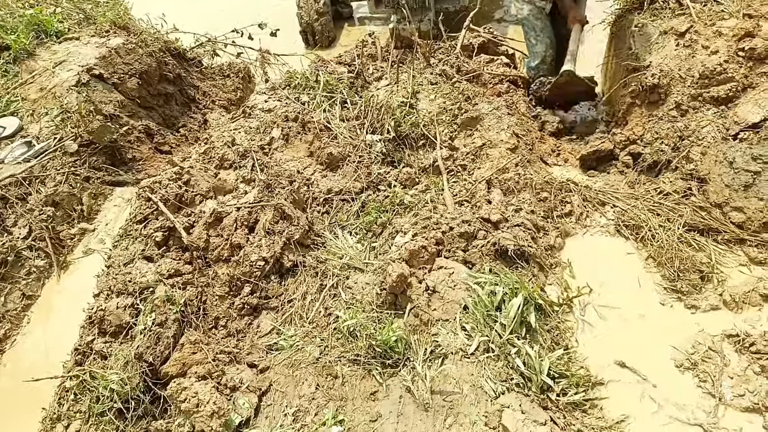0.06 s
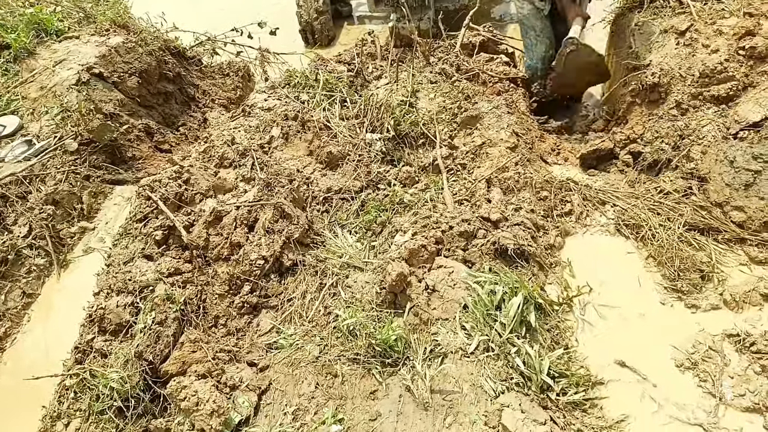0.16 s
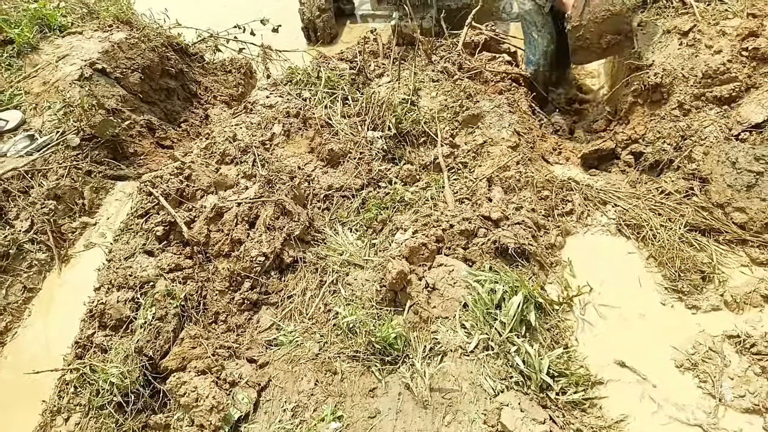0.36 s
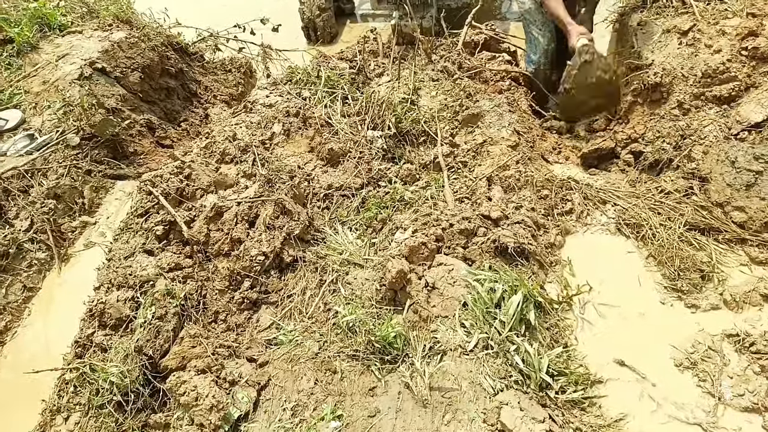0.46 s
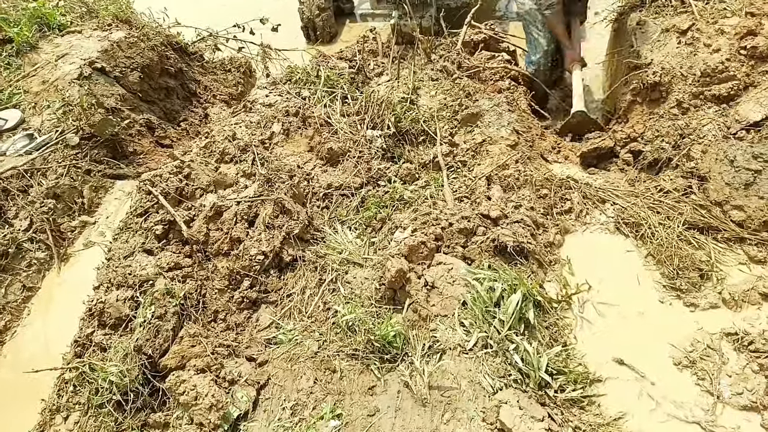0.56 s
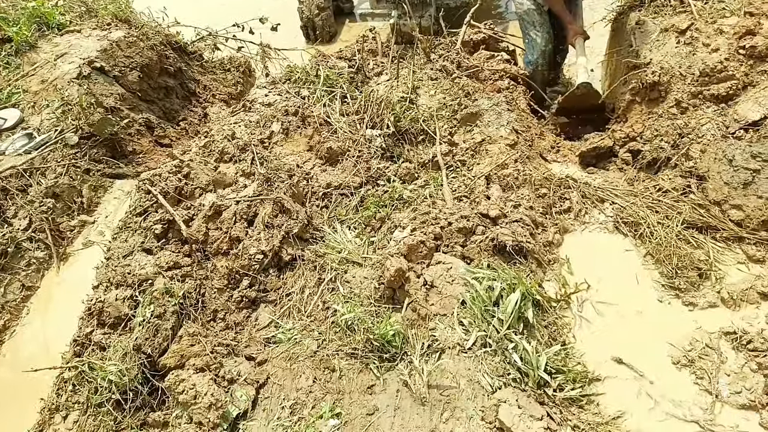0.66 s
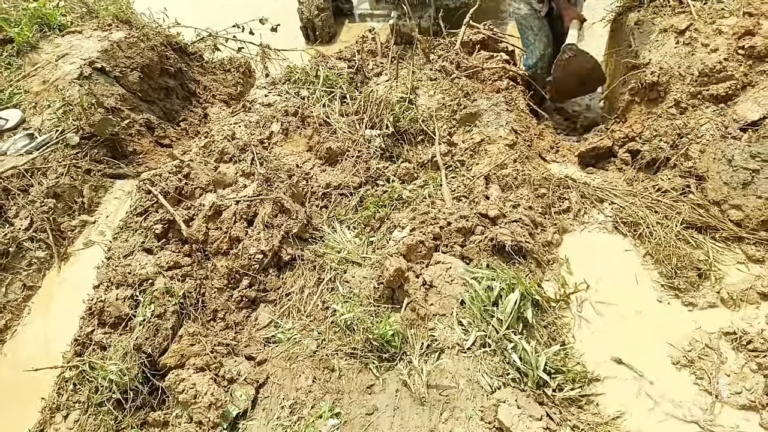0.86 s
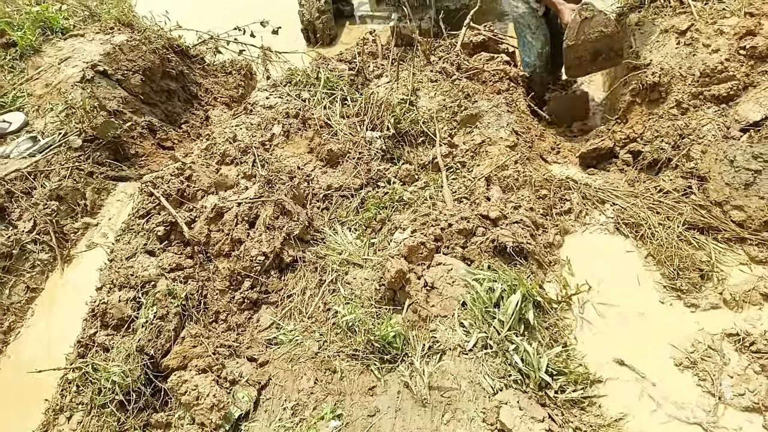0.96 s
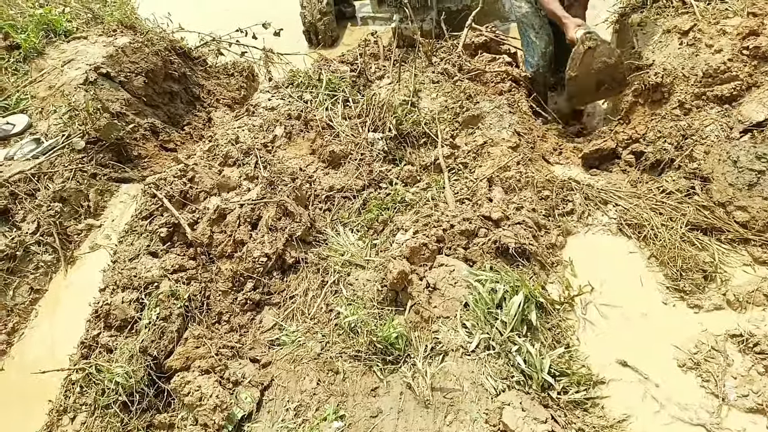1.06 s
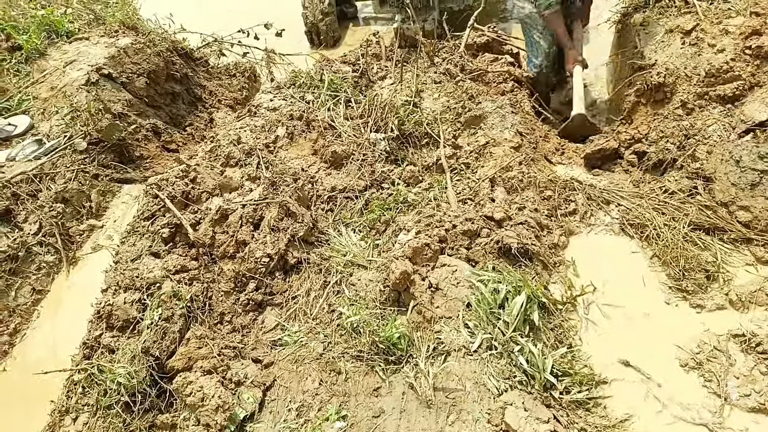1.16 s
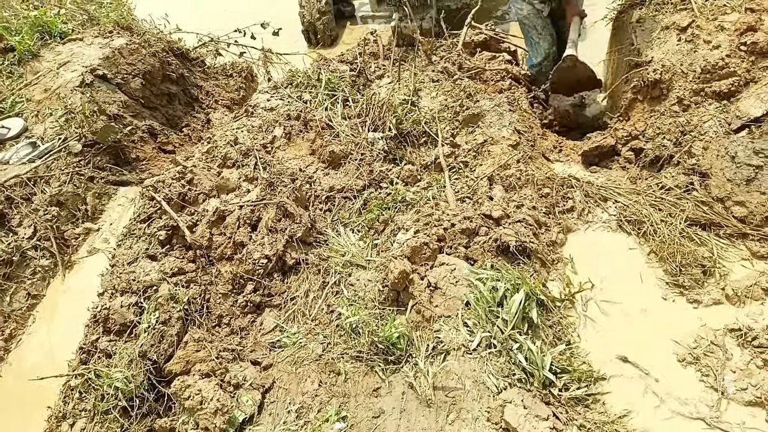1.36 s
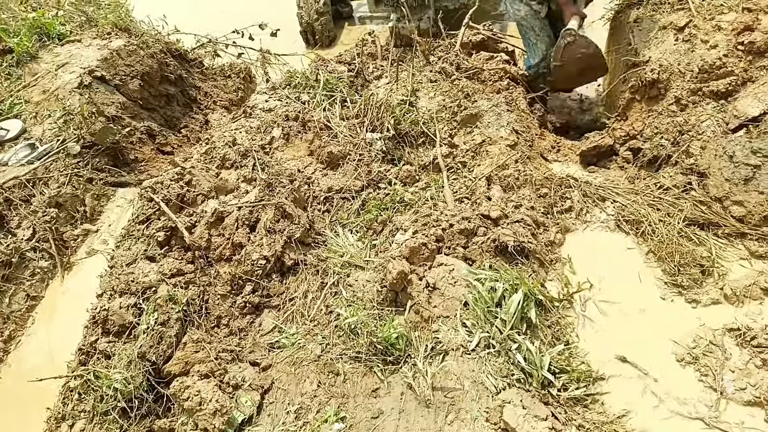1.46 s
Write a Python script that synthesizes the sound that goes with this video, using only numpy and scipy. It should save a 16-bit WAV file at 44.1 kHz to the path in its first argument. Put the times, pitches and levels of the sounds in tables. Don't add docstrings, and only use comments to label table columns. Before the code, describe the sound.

A spade works waterlogged mud, close and dry outdoors. Faint wet ticks and bubbles open until 0.2 s. From 0.23 to 0.5 s come the loudest slaps, low hollow plops, thick squelches and hissing spray. Soft bubbles fill a lull around 0.55 to 0.75 s. Lighter splashes return from 0.8 s, with a gulping squelch near 1.15 s, fading to tiny bright drops after 1.4 s.

```python
import sys
import numpy as np
from scipy import signal
from scipy.fft import rfft, irfft, next_fast_len
from scipy.io import wavfile
from scipy.ndimage import map_coordinates

SR = 44100
rng = np.random.default_rng(int(sys.argv[2]) if len(sys.argv) > 2 else 0)


def volts_from_decibels(level):
    exponent = np.asarray(level, float) / 20
    return 10 ** exponent


def persist_wave(psi):
    counts = np.round(np.clip(psi, -1, 1) * 32767).astype(np.int16)
    wavfile.write(sys.argv[1], SR, np.atleast_2d(counts).T)


N = 66150
RISE = 0.2


def unit(x):
    return x / np.sqrt(np.mean(x ** 2) + 1e-20)


def along(points, hz):
    f, v = np.transpose(points)
    return np.interp(np.log(hz + 1), np.log(f + 1), v)


def curve(rows):
    s, db = np.transpose(rows)
    return np.interp(np.arange(N) / SR, s, db)


def wobble(rate):
    return map_coordinates(rng.standard_normal(N // 40), [np.arange(N) * rate / SR])


def filtered(x, response):
    m = next_fast_len(N + 8192)
    hz = np.fft.rfftfreq(m, 1 / SR)
    return irfft(rfft(x, m) * response(hz), m)[..., :N]


def coloured(x, spectrum):
    return unit(filtered(x, lambda hz: volts_from_decibels(along(spectrum, hz))))


def thinned(x, level_db, edge_hz, full_db, extra):
    low = filtered(x, lambda hz: 1 / (1 + (hz / edge_hz) ** 8))
    loss_db = extra * np.minimum(level_db - full_db, 0)
    return x - low * (1 - volts_from_decibels(loss_db))


def tones(s, gain, hz, life, glide, swell, size):
    t = np.arange(size) / SR
    u = t / life[:, None]
    shape = (1 - np.exp(-u / swell)) ** 2 * 10 ** -u * (1 + 6 * swell)
    bend = 1 + glide * np.minimum(u, 2) / 2
    wave = gain[:, None] * shape * np.sin(2 * np.pi * hz[:, None] * t * bend)
    at = np.round(s * SR).astype(int)[:, None] + np.arange(size)
    return np.bincount(at.ravel(), wave.ravel(), N + size + SR)[:N]


def grains(count, centre_hz, spread, cycles, scatter_db, size):
    def stream():
        s = rng.uniform(0, N / SR, count)
        a, b = rng.standard_normal((2, count))
        rarity = np.minimum(rng.exponential(1, count), 3)
        hz = np.clip(centre_hz * np.exp(spread * a), 60, 17000)
        gain = volts_from_decibels(scatter_db * rarity) * np.sign(b)
        return tones(s, gain, hz, cycles * np.exp(0.5 * b) / hz, RISE, .1, size)
    return unit(np.array([stream(), stream()]))


def bell(hz, centre_hz, width):
    return np.exp(-(np.log((hz + 1) / centre_hz) / width) ** 2 / 2)


def bursts(rows, source, response):
    size, attack_s, crack, level_db = 8192, 0.00027, 3, -6.5
    t, hz = np.arange(size) / SR, np.fft.rfftfreq(size, 1 / SR)
    out = np.zeros((2, N + size))
    contact = crack * np.exp(-2j * np.pi * hz * 2 * attack_s)
    starts = rng.integers(0, N - size, size=len(rows))
    for (s, db, centre_hz, t60), start in zip(rows, starts):
        shape = volts_from_decibels(-60 * t / max(t60, .005)) * (1 - np.exp(-t / attack_s))
        spectrum = rfft(source[:, start:start + size]) + contact
        piece = shape * irfft(spectrum * response(hz, centre_hz), size)
        gain = volts_from_decibels(db + level_db) * np.sqrt(np.mean(shape ** 2))
        out[:, round(s * SR):][:, :size] += gain * unit(piece)
    return out[:, :N]


def both_ports(x):
    return np.array([x, np.roll(x, 57)])


# f/Hz, level/dB per Hz
AIR = [(30, -18.5), (100, 1), (480, -11.5), (800, -52.5), (2200, -33.5), (6500, -29), (12000, -20),
       (15500, -34)]
# t/s, level/dB
HUSH = [(0, 3), (.07, -4.5), (.12, 9), (.55, -2.5), (.64, -3), (.75, -0.5), (1.5, 4)]


def field_air():
    noise = rng.standard_normal((3, N))
    air = volts_from_decibels(-78 + 0.92 * wobble(12.1)) * coloured(noise, AIR)
    hiss = filtered(air, lambda hz: hz > 1000)
    air = air + (volts_from_decibels(curve(HUSH)) - 1) * hiss
    return air[0] + .8 * air[1:]


# t/s, peak level/dB, centre f/Hz, t60/s
SLAPS = [(0, -46, 3040, 0.13), (.086, -59.5, 3100, 0.11), (.135, -43.5, 5700, 0.019),
         (.174, -33.5, 3060, 0.03), (.22, -41.5, 4300, 0.1), (.267, -25, 1970, 0.054),
         (.285, -32, 3860, 0.13), (.422, -27.5, 2100, 0.02), (.433, -31, 2320, 0.045),
         (.4415, -19, 2120, 0.026), (.481, -25, 3730, 0.025), (.493, -27.5, 3100, 0.026),
         (.5, -23, 1660, 0.056), (.661, -47, 1770, 0.21), (.746, -37, 3080, 0.037), (.81, -30, 2450, 0.051),
         (.815, -34, 1630, 0.092), (.861, -36.5, 3400, 0.034), (.912, -33.5, 1970, 0.041),
         (.968, -28, 1440, .025), (.98, -29, 2500, 0.04), (.997, -29, 3450, 0.031),
         (1.047, -30, 1700, 0.048), (1.122, -42, 1400, 0.055), (1.143, -41, 3200, 0.069),
         (1.22, -33, 2730, 0.02), (1.2898, -48, 4000, 0.13), (1.293, -43.5, 1480, 0.09),
         (1.302, -47.5, 4170, 0.043), (.312, -39.5, 3230, 0.13), (.342, -33, 3200, 0.036),
         (.36, -32.5, 2600, 0.06), (.729, -49.5, 2350, 0.053), (.779, -50, 3150, 0.026),
         (1.048, -35.5, 5750, 0.078), (1.147, -37.5, 5970, 0.044), (1.149, -37, 3100, 0.054),
         (1.167, -36, 2500, 0.094), (1.245, -46, 3250, 0.018), (1.318, -49.5, 1680, 0.12)]
# f/Hz, level/dB
WATER = [(450, -19.5), (1100, -8.5), (1400, -4), (2000, -3.5), (4000, -5.5), (5500, -4), (7000, -27.5),
         (8500, -19)]


def slaps():
    def response(hz, centre_hz):
        skirt_db = -9.5 + along(WATER, hz)
        return bell(hz, centre_hz, width=0.27) + volts_from_decibels(skirt_db)
    fizz = grains(count=4000, centre_hz=2800, spread=0.625, cycles=4.37, scatter_db=2.5, size=250)
    return bursts(SLAPS, fizz + .5 * rng.standard_normal((2, N)), response)


# t/s, level/dB
SPLASH = [(.07, -87), (.125, -65), (.14, -50), (.21, -53.5), (.28, -41), (.37, -47), (.395, -50),
          (.43, -49.5), (.53, -51), (.635, -65), (.67, -63.5), (.8, -54.5), (.96, -49.5), (1.03, -48),
          (1.11, -57), (1.17, -50), (1.265, -58.5), (1.39, -76)]
# f/Hz, level/dB
SPRAY = [(3000, -36), (5500, 3), (7000, -3), (8000, -4), (9500, -12), (11500, 1), (14000, -5), (15600, 0.5)]


def splash():
    level_db = curve(SPLASH)
    surge_db = 2 * (wobble(29.33) + wobble(110))
    fizz = grains(count=2000, centre_hz=2500, spread=0.512, cycles=8.64, scatter_db=-1.0, size=500)
    body = coloured(fizz + 1.07 * rng.standard_normal((2, N)), WATER)
    body = thinned(body, level_db, edge_hz=1370, full_db=-52.5, extra=0.99)
    mist = grains(count=3000, centre_hz=10000, spread=0.47, cycles=2.0, scatter_db=4.0, size=80)
    spray = coloured(mist + 0.46 * rng.standard_normal((2, N)), SPRAY)
    spray_db = -11 + 2 * wobble(90.05)
    return volts_from_decibels(level_db + surge_db) * (body + volts_from_decibels(spray_db) * spray)


# t/s, level/dB
SQUELCH = [(.07, -81), (.12, -76), (.21, -76), (.235, -41), (.35, -36), (.385, -44), (.415, -45.5),
           (.47, -52.5), (.5, -38.5), (.57, -53.5), (.62, -70.5), (.8, -65.5), (.82, -56.5), (1.05, -58),
           (1.11, -61.5), (1.18, -40), (1.255, -52), (1.29, -73.5)]
# f/Hz, level/dB
MUD = [(160, 3), (250, 6.5), (450, 5.5), (800, 3.5), (1200, 6), (1500, -21.5), (2500, -64.5)]


def squelch():
    level_db = curve(SQUELCH)
    pops = grains(count=1100, centre_hz=520, spread=0.68, cycles=1.79, scatter_db=3, size=1200)
    body = coloured(pops + 2.1 * rng.standard_normal((2, N)), MUD)
    body = thinned(body, level_db, edge_hz=465, full_db=-46.5, extra=1)
    return volts_from_decibels(level_db + 2.5 * wobble(59.73)) * body


# t/s, peak level/dB, f/Hz, length/s
BUBBLES = [(.07, -73.5, 495, 0.022), (0.102, -67, 589, 0.048), (.15, -62, 609, 0.024),
           (0.134, -60, 883, 0.019), (0.154, -49.5, 1270, 0.016), (0.195, -72, 1520, 0.0092),
           (0.536, -45.5, 385, 0.04), (0.577, -53, 1213, 0.012), (0.61, -53.5, 1310, 0.0083),
           (0.568, -62.5, 690, 0.052), (0.599, -66, 715, 0.034), (0.634, -65, 663, 0.036),
           (0.653, -68, 630, .025), (0.684, -67, 1150, 0.045), (0.698, -54, 795, 0.027),
           (.81, -52.5, 447, 0.027), (.812, -54.5, 870, 0.035), (0.842, -50.5, 1111, 0.039),
           (0.913, -52.5, 624, 0.016), (0.951, -66, 580, 0.038), (0.99, -52.5, 630, 0.018),
           (1.045, -47.5, 810, 0.017), (1.037, -52, 507, 0.05), (1.325, -52.5, 1800, 0.0022),
           (1.406, -68, 1610, 0.0069)]


def bubbles():
    s, db, hz, life = np.transpose(BUBBLES)
    return both_ports(tones(s, volts_from_decibels(db + 4.5), hz, life, RISE / 4, 0.067, size=6000))


# t/s, peak level/dB
PUFFS = [(0.1351, -35.5), (0.266, -36), (0.288, -34), (0.4317, -39), (0.4395, -34.5), (0.5603, -51),
         (0.811, -40.5), (0.8621, -40), (0.9788, -39.5), (1.046, -44), (1.2454, -52), (.087, -65),
         (.146, -45), (.157, -49), (.175, -48), (1.125, -49.5), (.2204, -43), (.276, -36), (0.407, -66),
         (.479, -53), (.495, -43), (.598, -68), (0.681, -61), (0.699, -51.5), (0.744, -46.5), (0.801, -49),
         (.917, -43.5), (0.952, -49), (1.1473, -52), (1.19, -61.5), (1.218, -59.5), (1.285, -50),
         (1.303, -52), (1.353, -55)]


def puffs():
    rows = [(s, db, 0, 0.062) for s, db in PUFFS]
    noise = rng.standard_normal((2, N))
    return bursts(rows, noise, lambda hz, _: volts_from_decibels(along(SPRAY, hz)))


# t/s, peak level/dB, f/Hz, length/cycles
PLOPS = [(.23, -31.5, 552, 5), (.2375, -25.5, 529, 1.7), (.267, -16, 432, 1.53), (0.3017, -15.5, 410, 1.66),
         (.313, -15.5, 428, 1.5), (0.336, -30.5, 449, 3), (0.351, -22.5, 392, 1.6), (0.441, -21, 378, 1.6),
         (0.445, -24.5, 263, 3.1), (0.498, -24, 464, 1.34), (0.5, -29, 237, 3.6), (.503, -32.5, 96, 4.9),
         (.953, -47, 944, 8), (.973, -32, 406, 2.45), (1.012, -44, 947, 6.4), (1.058, -42, 594, 8.1),
         (1.118, -35, 860, 3.2), (1.125, -29, 1010, 2.5), (1.1995, -33.5, 396, 1.2),
         (0.2446, -28.5, 950, 2.4), (0.2758, -34.5, 520, 2.3), (.32, -35.5, 620, 3.5),
         (.33, -37.5, 450, 1.8), (0.347, -31.5, 420, 1.3), (.363, -31, 480, 2.8), (0.407, -34.5, 400, 3.1),
         (0.416, -40, 850, 5), (0.486, -32.5, 420, 2), (.493, -28, 300, 2.1), (0.505, -37.5, 230, 1.2),
         (.556, -39, 400, 3.1), (1.166, -39, 420, 2.8), (1.175, -42, 520, 2.3), (1.183, -44, 430, 2.8),
         (1.239, -48, 420, 2.3), (.317, -22.5, 406, 1.2), (0.5, -29, 203.7, 4.2), (1.13, -44.5, 1215, 10),
         (1.14, -36.5, 1474, 8.2)]


def plops():
    s, db, hz, cycles = np.transpose(PLOPS)
    life, sag = cycles / hz, 0.12
    body = tones(s, volts_from_decibels(db + 2.0), hz, life, -sag, 0.21, size=4000)
    upper_hz = hz * rng.uniform(1.964, 2.6, size=len(s))
    overtone = tones(s, volts_from_decibels(db - 11.5), upper_hz, life, RISE, 0.17, size=4000)
    return both_ports(body + overtone)


# t/s, peak level/dB, f/Hz
DROPS = [
    (1.406, -59.5, 10100),
    (1.423, -58, 10800),
    (1.438, -58.5, 6360),
    (1.472, -57.5, 8800),
    (1.484, -59, 7060),
]


def drops():
    rows = [(*row, 0.039) for row in DROPS]
    noise = rng.standard_normal((2, N))
    return bursts(rows, noise, lambda hz, centre_hz: bell(hz, centre_hz, width=0.2))


def bank(x):
    t60_s, first_s = .05, .002
    t = np.arange(SR // 8) / SR
    tail = rng.standard_normal((2, len(t))) * volts_from_decibels(-60 * t / t60_s) * (t > first_s)
    return signal.fftconvolve(x, tail / np.linalg.norm(tail[0]), axes=1)[:, :N]


# f/Hz, correlation 0..1
ALIKE = [(300, 0.99), (1000, 0.79), (2500, 0.52), (14000, 0.15)]


def scene():
    pair = slaps() + splash() + squelch() + bubbles() + puffs() + plops() + drops()
    pair = pair + volts_from_decibels(-11) * bank(pair)

    def share(hz):
        turn = np.arccos(np.clip(along(ALIKE, hz), -1, 1)) / 2
        low_cut = (1j * hz / (1j * hz + 170)) ** 4
        return low_cut * [np.cos(turn), np.sin(turn)]
    mid, side = filtered(pair, share)
    return np.array([mid + side, mid - side]) + field_air()


def low_pass(x):
    return signal.sosfilt(signal.butter(12, 16670, fs=SR, output="sos"), x)


# f/Hz, width/Hz, level/dB
PORT = [(1800, 61, 0.5), (2400, 190, 3.5), (3100, 208, 8), (3910, 127, 8), (6640, 620, 8.5),
        (1400, 140, -4.5), (2600, 290, -4), (7700, 596, 0)]
# f/Hz, left over right level/dB
LEAN = [(100, 1), (700, 1.5), (1200, -2.5), (2700, 3.5), (4200, 0.5), (6400, -8), (9000, 12), (15000, 5)]


def record(dry):
    top_hz, lead_rad, lead_from_hz, lead_period_hz = 15800, 2.2, 3200, 1700

    def ports(hz):
        bumps_db = sum(db * np.exp(-((hz - c) / w) ** 2) for c, w, db in PORT)
        ramp = np.minimum(hz / lead_from_hz, 1) ** 2
        lead = lead_rad * ramp * np.sin(2 * np.pi * hz / lead_period_hz)
        half = volts_from_decibels(along(LEAN, hz) / 2) * np.exp(.5j * lead)
        return volts_from_decibels(bumps_db) * (hz < top_hz) * np.array([half, 1 / half])
    return low_pass(filtered(dry, ports))


dry = scene()
out = record(dry)
persist_wave(out)
```